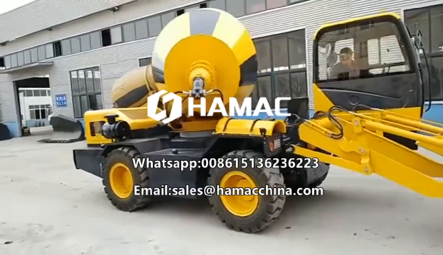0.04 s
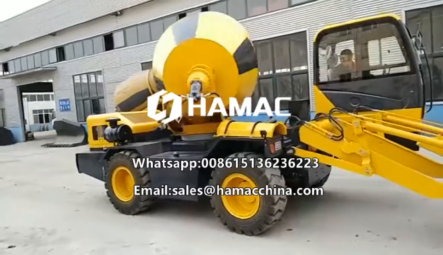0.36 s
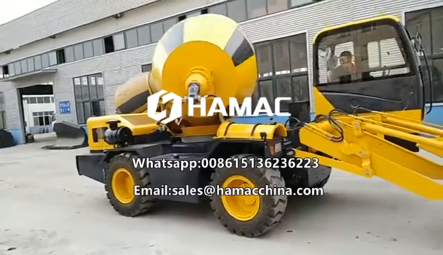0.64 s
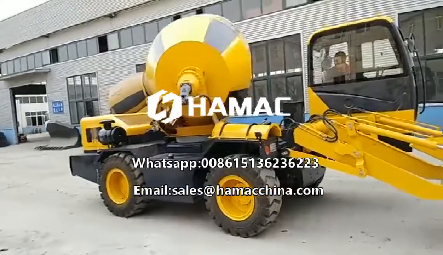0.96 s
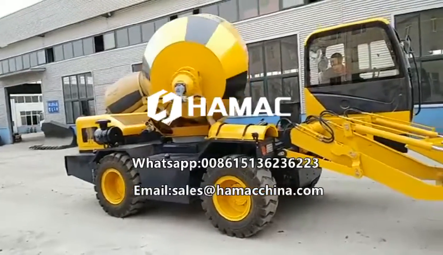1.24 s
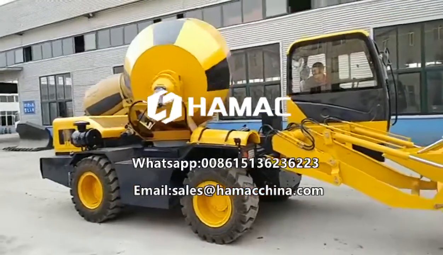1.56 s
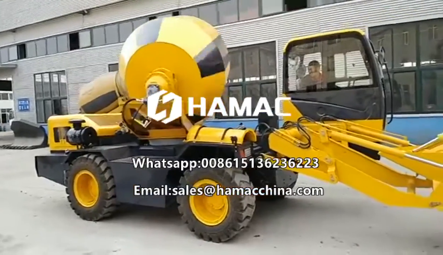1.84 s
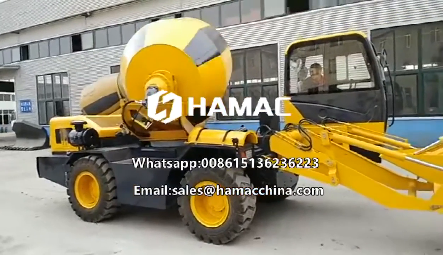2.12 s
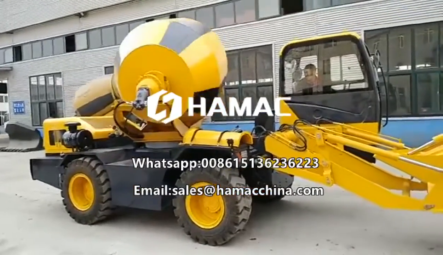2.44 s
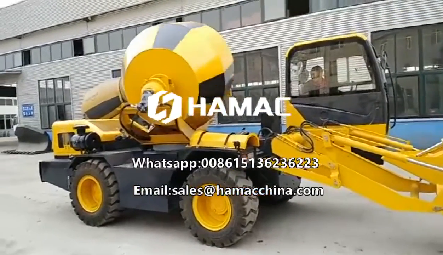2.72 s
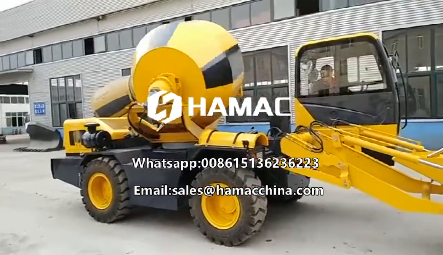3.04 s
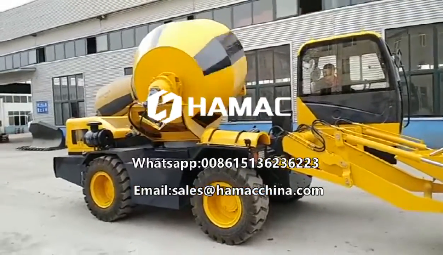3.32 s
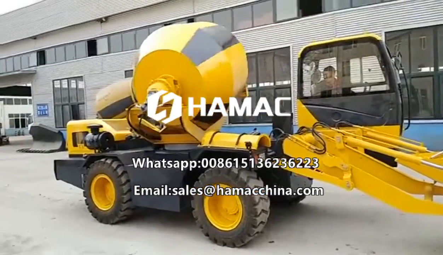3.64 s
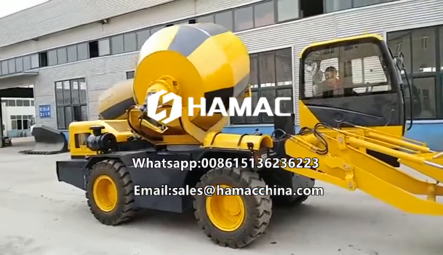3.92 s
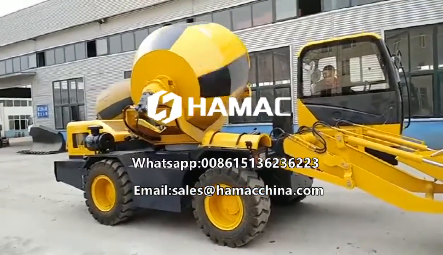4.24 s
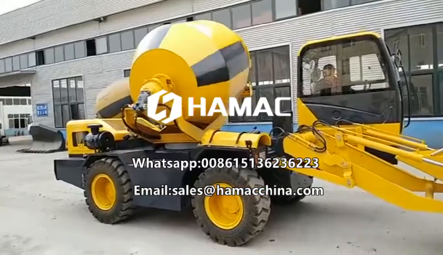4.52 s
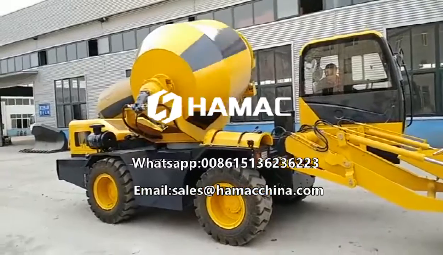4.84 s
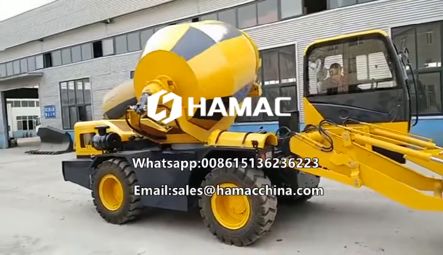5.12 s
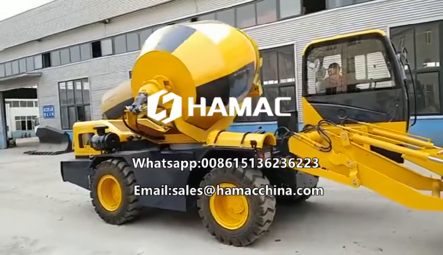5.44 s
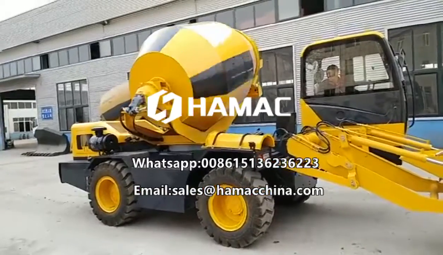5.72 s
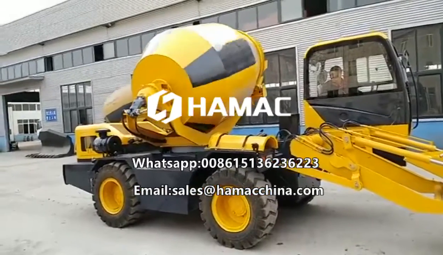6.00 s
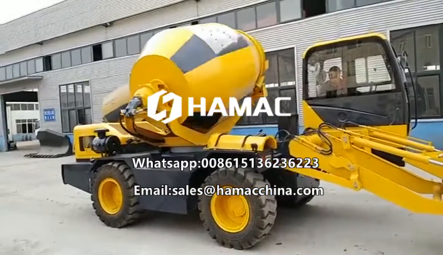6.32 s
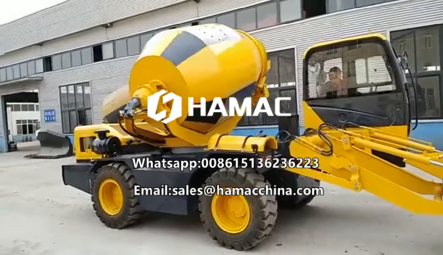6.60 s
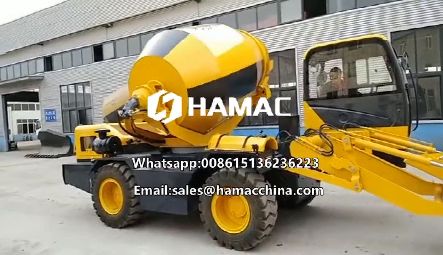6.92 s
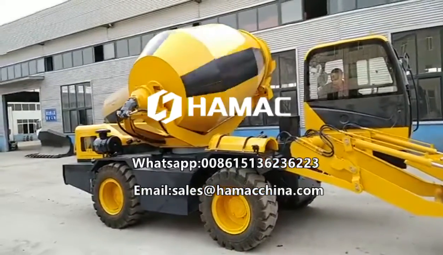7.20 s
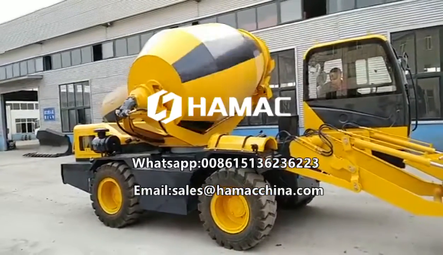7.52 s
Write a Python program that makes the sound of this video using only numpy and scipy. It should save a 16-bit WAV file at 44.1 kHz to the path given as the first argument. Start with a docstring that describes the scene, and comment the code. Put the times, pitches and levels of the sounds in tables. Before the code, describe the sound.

Outdoors in a yard, a hand-held phone picks up a mixer's diesel engine running at an even idle, humming and clattering under a constant hiss. After one faint metallic tap, wind starts to buffet the microphone in short gusts. Midway a quick cluster of bright steel clanks rattles and dies away, then heavier wind thumps follow, mainly on the left, while the engine drones on unchanged.

```python
"""A diesel engine idles steadily in a self-loading concrete mixer, some metres away in a factory yard.
Periodic firing makes its exhaust drone, the block clatters alike in every cycle, and fan and hydraulic
oil hiss. A loose steel part, struck once early on, clanks and rattles half-way through, its impacts
exciting the steel's modes. Turbulent gusts and single eddies buffet the two microphone ports of a
hand-held phone, mostly the left one."""
import sys
import numpy as np
from scipy import signal
from scipy.fft import rfft, irfft
from scipy.io import wavfile
from scipy.ndimage import uniform_filter1d

SR = 44100
rng = np.random.default_rng(int(sys.argv[2]) if len(sys.argv) > 2 else 0)


def store_wav(level_fs):
    """Save 16-bit WAV to argv[1]."""
    pcm = np.round(np.clip(np.atleast_2d(level_fs), -1, 1) * 32767)
    wavfile.write(sys.argv[1], SR, pcm.T.astype(np.int16))


N = 342216
TIME = np.arange(N) / SR
FREQ = np.maximum(np.arange(N // 2 + 1) * SR / N, 1)
CYCLE_HZ, PUMP_HZ = 8.9, 96.1

# Levels in the tables are relative: each source applies its own gain afterwards.
# Engine harmonics. Each row: multiple of the cycle rate, level in dB.
ENGINE_ORDERS = [(6, -32), (12, -26.5), (20, -30.6), (24, -39.5), (48, -46.5)]
# Slow course of the hums. Each row: time in seconds, exhaust tone gain in dB, pump level in dB.
HUM_LEVELS = [(0, 1.5, -29), (1.3, 1, -33.5), (2.601, 1.4, -34.5), (4.0, 3.5, -28.5), (4.501, 3.5, -41.5),
              (6.3, 0.5, -50), (7.76, -2, -29)]
# Exhaust rumble. Each row: frequency in Hz, spectral density in dB.
RUMBLE_SPECTRUM = [(15, -13.5), (28, -13), (48, -9.5), (70, -1.5), (95, -0.5), (145, -2.2), (195, -2),
                   (270, -7), (380, -11), (520, -19), (900, -55)]
# Likeness of the machine's sound at the two ports. Each row: frequency in Hz, coherence from 0 to 1.
PORT_COHERENCE = [(60, 0.76), (300, 1), (550, 1), (1000, 0.66), (1600, 0), (3000, 0.25), (7000, 0)]
# Injector and valve knocks. Each row: place in the cycle from 0 to 1, strength in dB.
VALVE_KNOCKS = [(0.17, 1.5), (0.251, -6.5), (0.353, -3.5), (0.553, -8.5), (0.649, -3.5), (0.687, -8.5),
                (0.811, -2)]
# Response of the block and covers. Each row: frequency in Hz, spectral density in dB.
BLOCK_SPECTRUM = [(300, -7.5), (530, -1), (650, 5.5), (830, 2), (1020, 3), (1330, 5.5), (1520, -4),
                  (1700, -16), (2700, -6.5), (4000, -47), (7400, -55.5), (7700, -76)]
# Resonances and hollows of the covers. Each row: frequency in Hz, width in Hz, gain in dB.
COVER_MODES = [(655, 70, 2.5), (845, 70, -2), (935, 30, 2), (1022, 36, 4), (1122, 16, 3), (1229, 16, 2.5),
               (1385, 50, 2), (1470, 70, 2.5), (1610, 60, 6.5)]
# Fan and hydraulic hiss. Each row: frequency in Hz, spectral density in dB.
HISS_SPECTRUM = [(700, -11), (1700, 6), (2800, 3.5), (3450, 3.5), (3800, 5.5), (5500, 2.5), (7400, 1.9)]
# Resonances in the hiss. Each row: frequency in Hz, width in Hz, gain in dB.
HISS_MODES = [(1772, 35, 6.5), (2487, 50, 5), (2600, 110, 3.5), (2920, 130, 3), (4440, 70, 2),
              (4820, 110, 2.5), (5000, 55, 4), (5420, 90, 2), (5700, 60, 4), (6200, 100, 5),
              (6430, 90, 2.5)]
# Treble limit of hiss, soft blows, rattle and echo. Each row: frequency in Hz, gain in dB.
TREBLE_CUT = [(7500, 0), (7720, -50)]
# Gusts. Each row: start in seconds, length in seconds, left level in dB, right against left in dB.
WIND_GUSTS = [(1.559, 0.088, -26, -2), (2.227, 0.29, -24.5, -1.5), (3.746, 0.33, -23.5, -7.5),
              (4.64, 0.59, -23.5, -8.5), (5.613, 0.15, -23.5, -10), (5.966, 0.05, -25, -7.5),
              (6.281, 1.02, -26.5, -7)]
# Turbulence at a port. Each row: frequency in Hz, spectral density in dB.
WIND_SPECTRUM = [(20, -38), (45, -16.5), (80, 1.5), (130, 0.5), (210, -0.5), (320, -7.5), (480, -13),
                 (750, -24), (1400, -39.5), (4000, -58.5), (7400, -81.5), (7700, -110)]
# The strongest eddies. Each row: centre in seconds, half length in seconds, thump level in dB,
# slap level in dB, share at the right port from 0 to 1.
EDDY_STRIKES = [(0.025, 0.012, -18, -21.5, 0.8), (1.747, 0.014, -14, -23.5, 0.17),
                (2.31, 0.033, -17.5, -18.5, 0), (2.383, 0.0034, -11, -20, 1), (2.418, 0.015, -15.5, -25, 1),
                (2.509, 0.0075, -14.5, -23, 0.2), (2.543, .006, -15, -27, .4),
                (3.73, 0.008, -11.5, -26, .15), (4.016, 0.02, -13.5, -22, 0.05),
                (4.437, 0.0064, -15, -33, .5), (4.622, 0.0065, -10, -19, .1),
                (4.668, 0.0095, -6.5, -18, .1), (4.718, 0.0072, -10.5, -30, .1),
                (4.861, 0.009, -13.5, -14.5, 0.1), (4.884, 0.012, -8, -15.5, 0),
                (4.98, 0.0049, -11, -16, 0), (5.004, 0.0065, -10, -25, 0), (5.052, 0.0037, -9.5, -19, 0),
                (5.076, .005, -13.5, -23, .8), (5.117, .006, -16, -32, 0), (5.19, 0.018, -21.5, -35, 0),
                (5.582, 0.0054, -12.5, -33, 0.15), (5.756, 0.01, -13, -18, 0), (5.961, .005, -18, -20, .1),
                (6.003, 0.0047, -8.5, -32, 0), (6.027, 0.0085, -12.5, -30, 0), (6.72, 0.011, -21, -21, 0.2)]
# An eddy's low thump. Each row: frequency in Hz, spectral density in dB.
THUMP_SPECTRUM = [(20, -39.5), (60, -12), (115, 1), (220, -0.5), (320, -7.5), (500, -19), (1400, -43),
                  (7400, -93.5)]
# An eddy's brighter slap. Each row: frequency in Hz, spectral density in dB.
SLAP_SPECTRUM = [(130, -24), (290, 1), (450, 1), (800, -7), (1400, -19), (3000, -44), (7400, -95)]
# Blows of the loose part. Each row: peak time in seconds, level in dB, rise in seconds,
# spectral centre in Hz, spread in octaves.
STEEL_BLOWS = [(0.248, -23, 0.013, 3900, 1.2), (3.837, -20.5, 0.005, 5480, .95),
               (3.853, -10, 0.0048, 4800, 0.97), (3.888, -25, .006, 3300, .7),
               (3.927, -27, .008, 4100, 0.78), (3.984, -12.5, 0.005, 4980, 1.1),
               (4.056, -18.5, 0.007, 2970, 0.55), (4.068, -19.5, 0.0041, 2950, 0.43),
               (4.122, -24, 0.02, 1150, 0.41), (4.13, -28.5, 0.0064, 2700, 0.65),
               (4.2, -26, .01, 2380, 0.72), (4.226, -27.5, 0.0077, 3350, 0.85)]
# Modes of the steel. Each row: frequency in Hz, width in Hz, gain in dB.
STEEL_MODES = [(824, 130, 10), (1100, 200, 9), (1330, 110, 6), (2240, 80, 3), (2620, 70, 3), (2750, 80, 3),
               (2860, 70, 4), (2980, 80, 4), (3290, 130, 4), (3810, 80, 4), (3895, 70, 4), (3990, 60, 3),
               (4430, 60, 2.5), (4915, 60, 3), (4995, 60, 3.5), (5700, 70, 2.5), (5960, 60, 3),
               (6400, 100, 2.5), (6885, 90, 5), (7410, 70, 3)]
# Treble limit of the clank. Each row: frequency in Hz, gain in dB.
CLANK_TREBLE_LIMIT = [(7300, 0), (7700, -7), (8400, -15)]


def undb(db):
    """Amplitude grows tenfold with every 20 dB."""
    return 10 ** (np.asarray(db) / 20)


def unit(x):
    """Normalisation to an rms of 1."""
    return x / np.sqrt(np.mean(x ** 2))


def over_freq(points):
    """Interpolation of (Hz, value) points on a logarithmic frequency axis."""
    hz, value = np.transpose(points)
    return np.interp(np.log(FREQ), np.log(hz), value)


def resonances(modes):
    """Each resonance adds a Lorentzian peak to a response in dB."""
    return sum(db / (1 + (2 * (FREQ - hz) / width) ** 2) for hz, width, db in modes)


def colour(x, db):
    """Linear filtering multiplies the spectrum by a response; the result has rms 1."""
    return unit(irfft(rfft(x) * undb(db), N))


def walk(rate_hz):
    """Random modulation: held values, smoothed twice, with rms 1."""
    hold = int(SR / rate_hz)
    steps = np.repeat(rng.standard_normal(1024)[:N // hold + 1], hold)
    return unit(uniform_filter1d(uniform_filter1d(steps, hold), hold // 2)[:N])


def at_ports(direct, scattered, left_lag_s=.00012):
    """Partial coherence: the ports share the direct sound; scattered sound differs and rules the treble."""
    share = np.clip(over_freq(PORT_COHERENCE), 0, 1)
    lag = np.exp(-2j * np.pi * FREQ * np.array([[left_lag_s], [0]]))
    return irfft(rfft(direct) * lag * np.sqrt(share) + rfft(scattered) * np.sqrt(1 - share), N)


def pan(x, left_db):
    """A level difference between the ports moves a source to the left."""
    return x * undb(np.array([[left_db], [-left_db]]) / 2)


def cyclic_noise(cycles, repeat):
    """Partly periodic excitation: the share `repeat` of its power recurs in every engine cycle."""
    size = int(SR / CYCLE_HZ)
    pattern = rng.standard_normal((3, size))[:, (cycles % 1 * size).astype(int)]
    push = np.sqrt(repeat) * pattern + np.sqrt(1 - repeat) * rng.standard_normal((3, N))
    return at_ports(push[0], push[1:])


def exhaust_drone(cycles, gain_db, waver_db):
    """Periodic firing gives harmonics of the cycle; uneven combustion makes the overtones chug."""
    times, load_db, _ = np.transpose(HUM_LEVELS)
    firing, *overtones = [undb(db) * np.sin(2 * np.pi * (round(order) * cycles + rng.random()))
                          for order, db in ENGINE_ORDERS]
    chug = undb(3 * np.tanh(walk(26)))
    firing = firing * undb(waver_db * walk(5.9))
    upper = chug * sum(tone * undb(waver_db * walk(7.9)) for tone in overtones)
    return np.sqrt(2) * undb(gain_db + np.interp(TIME, times, load_db)) * (firing + upper)


def pump_hum(drift_rad, lift_db, lift_period_s, lift_peak_s):
    """The pump's tone beats against the engine's and swells each time the turning drum lifts its load."""
    times, _, hum_db = np.transpose(HUM_LEVELS)
    labour_db = lift_db * np.cos(2 * np.pi * (TIME - lift_peak_s) / lift_period_s)
    tone = np.sin(2 * np.pi * PUMP_HZ * TIME + drift_rad * walk(3))
    return np.sqrt(2) * undb(np.interp(TIME, times, hum_db) + labour_db) * tone


def exhaust_rumble(cycles, gain_db):
    """Low-pass filtering of weakly periodic noise gives the exhaust its rough rumble."""
    response_db = over_freq(RUMBLE_SPECTRUM) - 20 * np.log10(1 + (FREQ / 1500) ** 2)
    return undb(gain_db) * colour(cyclic_noise(cycles, repeat=.088), response_db)


def block_clatter(cycles, gain_db, decay_cycles, wall_delay_s, wall_db):
    """Injectors and valves force the block to vibrate; a wall reflection comb-filters the clatter."""
    knocks = sum(undb(db) * np.exp(-((cycles - place) % 1) / decay_cycles) for place, db in VALVE_KNOCKS)
    force = cyclic_noise(cycles, repeat=.19) * (1 + .77 * knocks) * undb(1.16 * walk(25))
    reflection = undb(wall_db) * np.roll(force, int(wall_delay_s * SR), axis=1)
    return undb(gain_db) * colour(force + reflection, over_freq(BLOCK_SPECTRUM) + resonances(COVER_MODES))


def flicker(x, depth_db):
    """Independent modulation makes narrow bands flicker while their sum stays steady."""
    bands = signal.stft(x, nperseg=1024)[2]
    chance = rng.standard_normal(bands.shape[1:])
    chance = unit(uniform_filter1d(uniform_filter1d(chance, size=4, axis=0), size=2, axis=1))
    gain = undb(depth_db * np.minimum(chance, 1.3))
    return unit(signal.istft(bands * gain)[1][:, :N])


def flow_hiss(gain_db, mode_sway):
    """Flow noise of fan and hydraulic oil, coloured by resonances that each come and go on their own."""
    noise = at_ports(rng.standard_normal(N), rng.standard_normal((2, N)))
    hiss = colour(noise, over_freq(HISS_SPECTRUM))
    spectrum = rfft(hiss)
    for mode in HISS_MODES:
        ring = irfft(spectrum * (undb(resonances([mode])) - 1), N)
        hiss = hiss + ring * (1 + mode_sway * np.tanh(walk(3)))
    flutter = undb(.9 * np.tanh(walk(40)))
    hiss = colour(flicker(hiss, depth_db=3.2) * flutter, over_freq(TREBLE_CUT))
    return undb(gain_db) * pan(hiss, left_db=1.16)


def wind(gain_db, breeze_db, attack_s, release_s, churn_db, surge_db):
    """Turbulent pressure fluctuates at each port on its own; gusts add in power to a light breeze."""
    force = undb(breeze_db)[:, None]  # left, right
    for start, length, db, right_db in WIND_GUSTS:
        rise = np.minimum(TIME - start, 0) / attack_s
        fall = np.maximum(TIME - start - length, 0) / release_s
        force = np.hypot(force, undb([[db], [db + right_db]]) * np.exp(rise - fall))
    force = force * undb([churn_db * np.tanh(walk(60)) + surge_db * walk(12) for port in range(2)])
    pressure = force * rng.standard_normal((2, N))
    return undb(gain_db) * irfft(rfft(pressure) * unit(undb(over_freq(WIND_SPECTRUM))), N)


def burst(noise, window):
    """Windowing cuts a pulse from turbulence, scaled to the energy of the window."""
    piece = noise * window
    return piece * np.sqrt(np.sum(window ** 2) / np.sum(piece ** 2))


def eddies(gain_db):
    """An eddy striking a port is a pressure pulse: a low thump with a brighter slap."""
    thump = colour(rng.standard_normal(N), over_freq(THUMP_SPECTRUM))
    slap = colour(rng.standard_normal(N), over_freq(SLAP_SPECTRUM))
    out = np.zeros((2, N))
    for centre, half_length, thump_db, slap_db, right in EDDY_STRIKES:
        near = np.abs(TIME - centre) < .1
        window = np.exp(-((TIME[near] - centre) / half_length) ** 2 / 2)
        pulse = undb(thump_db) * burst(thump[near], window) + undb(slap_db) * burst(slap[near], window)
        out[:, near] += np.outer([1 - right, right], pulse)
    return undb(gain_db) * out


def contacts(shower, hz, octaves):
    """Contact hardness sets the band in which the steel is excited: harder contacts sound higher."""
    band_db = -10 * np.log10(1 + (np.log2(FREQ / hz) / octaves) ** 4)
    return colour(shower, resonances(STEEL_MODES) + band_db + over_freq(CLANK_TREBLE_LIMIT))


def convolve(x, response):
    """Convolution with a stereo impulse response, scaled to a mean energy of 1 per port."""
    return signal.fftconvolve(x, response / np.sqrt(np.sum(response ** 2) / 2), axes=1)[:, :N]


def ringing(push, t60_s, lowest_hz):
    """Free vibration: the steel's high modes ring on after contact, while the low ones are damped."""
    age = TIME[:SR // 2]
    modes = sum(undb(db) * np.sin(2 * np.pi * (hz * age + rng.random((2, 1))))
                for hz, _, db in STEEL_MODES if hz > lowest_hz)
    return convolve(push, modes * undb(-60 * age / t60_s))


def wall_echo(x, delay_s, t60_s):
    """Diffuse reflection from the factory wall returns a delayed, exponentially decaying tail."""
    age = TIME[:SR]
    noise = colour(rng.standard_normal((2, N)), over_freq(TREBLE_CUT))[:, :SR]
    return convolve(x, noise * undb(-60 * age / t60_s) * (age > delay_s))


def steel_clank(gain_db, blow_t60_s, rattle_rise_s, rattle_t60_s, hard_hz):
    """Impact excitation: each blow is a shower of tiny contacts, after which the loose part rattles on."""
    shower = at_ports(rng.standard_normal(N), rng.standard_normal((2, N)))
    grain_db = 2 * np.repeat(rng.standard_normal(N // 64 + 1), 64)[:N]
    hard = shower * undb(grain_db)
    soft = colour(hard, over_freq(TREBLE_CUT))
    blows, rattle_envelope = 0, 0
    for peak_s, db, rise_s, hz, octaves in STEEL_BLOWS:
        age = np.maximum(TIME - peak_s, 0)
        swell = np.exp(np.minimum(TIME - peak_s, 0) / rise_s)
        decay = undb(-60 * np.minimum(age / blow_t60_s, 2))
        blows = blows + undb(db) * swell * decay * contacts(hard if hz > hard_hz else soft, hz, octaves)
        shake = (1 - np.exp(-age / rattle_rise_s)) * undb(db - 60 * age / rattle_t60_s)
        rattle_envelope = np.hypot(rattle_envelope, shake)
    rattle = undb(-9) * contacts(soft, hz=3080, octaves=.94)
    panel = undb(-14.5) * contacts(soft, hz=990, octaves=.28)  # the panel carrying the part booms lower
    steel = blows + rattle_envelope * (rattle + panel)
    steel = steel + undb(-19) * ringing(steel, t60_s=.11, lowest_hz=2000)
    steel = steel + undb(-17) * wall_echo(steel, delay_s=.025, t60_s=.24)
    return undb(gain_db) * pan(steel, left_db=1.5)


def scene():
    """Superposition: the pressures of machine and moving air add at the two ports."""
    # the governor holds the engine speed to about a thousandth
    cycles = np.cumsum(CYCLE_HZ * (1 + .001 * walk(1.5))) / SR
    machine = (exhaust_drone(cycles, gain_db=-3, waver_db=1.5)
               + pump_hum(drift_rad=1.3, lift_db=2, lift_period_s=1.5, lift_peak_s=4.3)
               + exhaust_rumble(cycles, gain_db=-26.5)
               + block_clatter(cycles, gain_db=-27.5, decay_cycles=.05, wall_delay_s=.03745, wall_db=-15)
               + flow_hiss(gain_db=-30.5, mode_sway=.55))
    steel = steel_clank(gain_db=-1.5, blow_t60_s=.099, rattle_rise_s=.018, rattle_t60_s=.52, hard_hz=4200)
    air = wind(gain_db=1.5, breeze_db=(-38, -42.5), attack_s=.13, release_s=.16, churn_db=6, surge_db=2.3)
    return machine + air + eddies(gain_db=-.5) + steel


def record(dry, ceiling=.85, top_hz=8300):
    """A soft limiter rounds the loudest peaks; a low-pass filter cuts the top."""
    rounded = dry / (1 + (dry / ceiling) ** 10) ** (1 / 10)
    return signal.sosfiltfilt(signal.ellip(8, .05, 50, top_hz, fs=SR, output="sos"), rounded)


dry = scene()
out = record(dry)
store_wav(out)
```